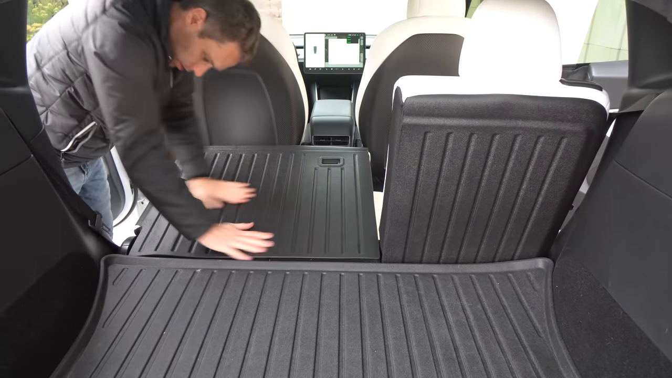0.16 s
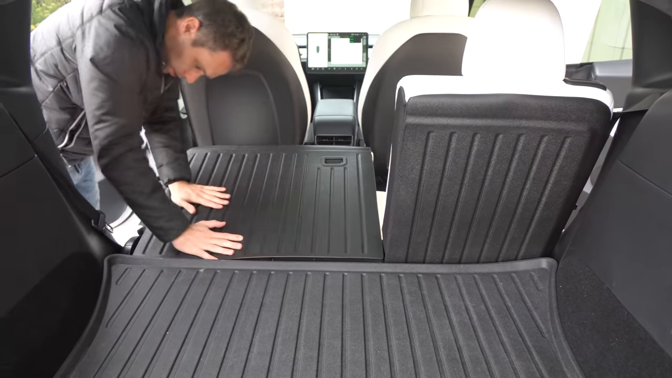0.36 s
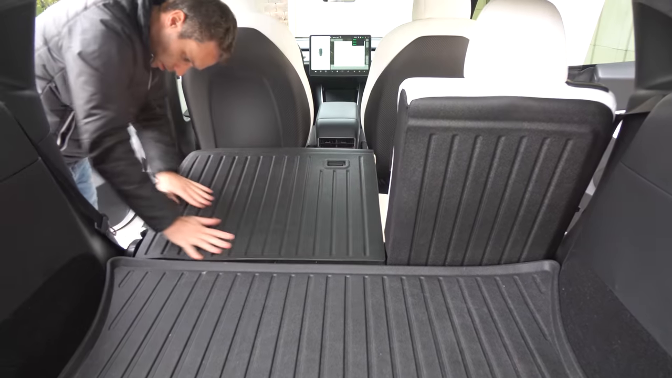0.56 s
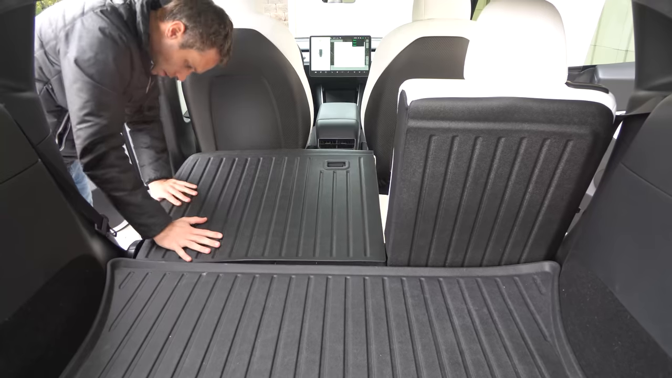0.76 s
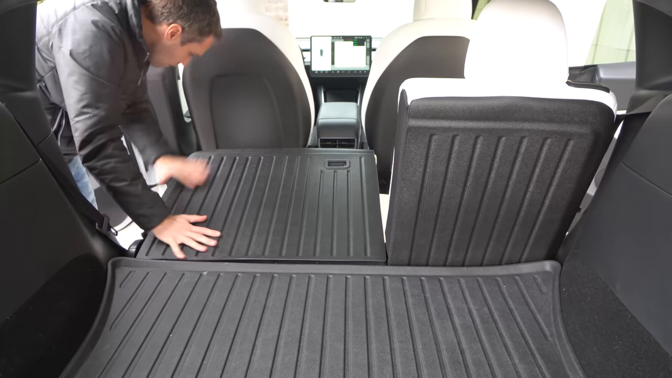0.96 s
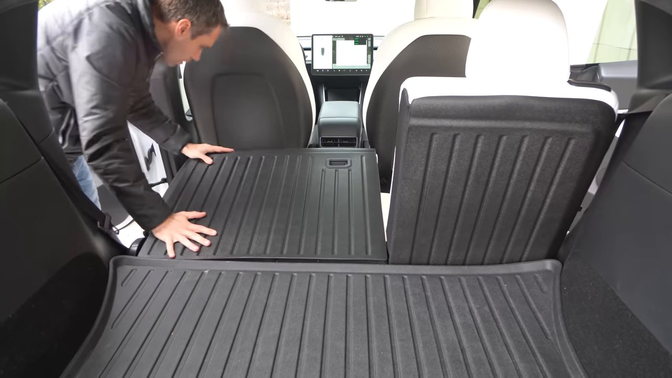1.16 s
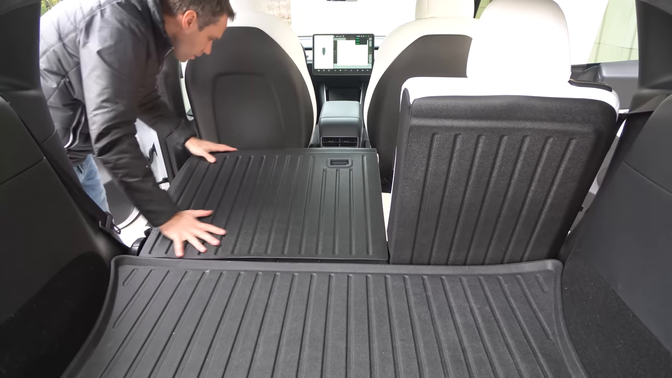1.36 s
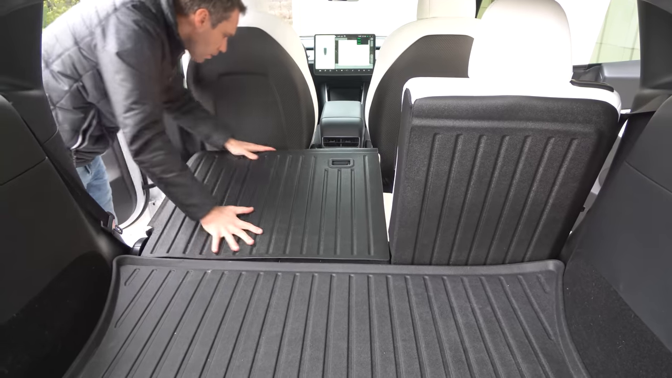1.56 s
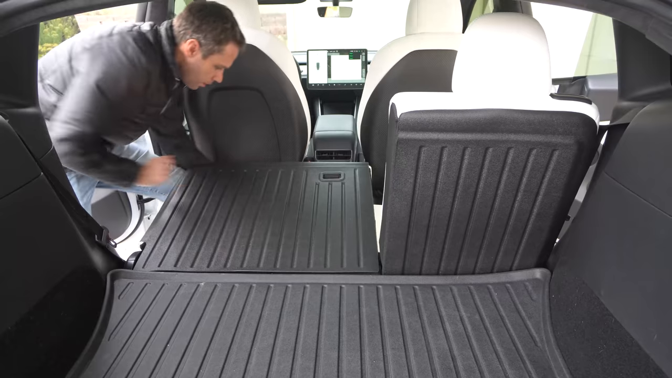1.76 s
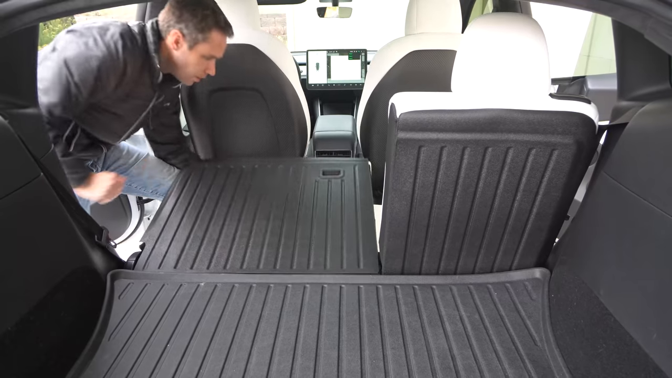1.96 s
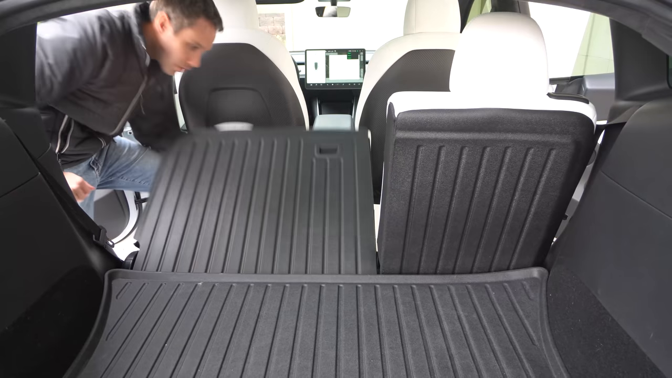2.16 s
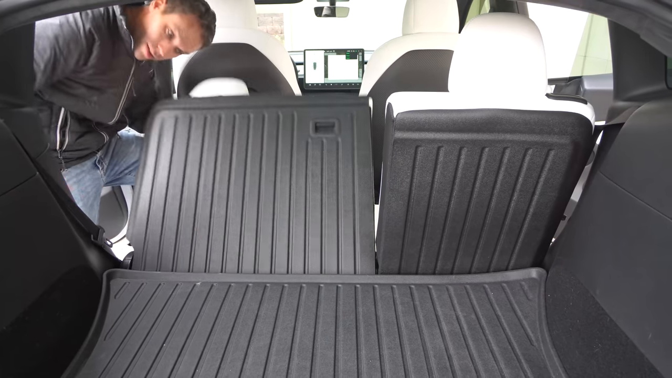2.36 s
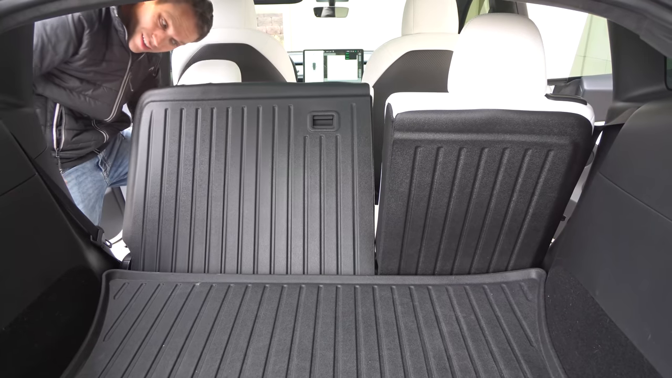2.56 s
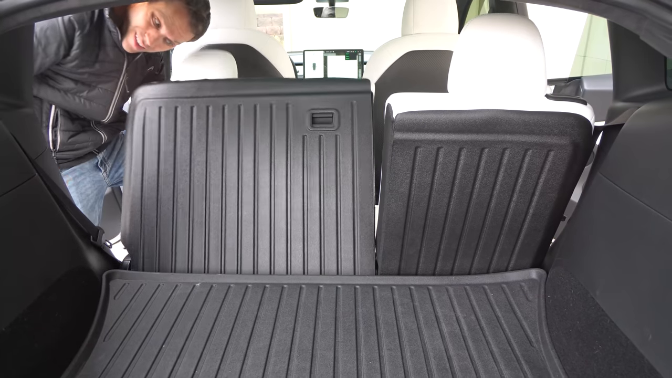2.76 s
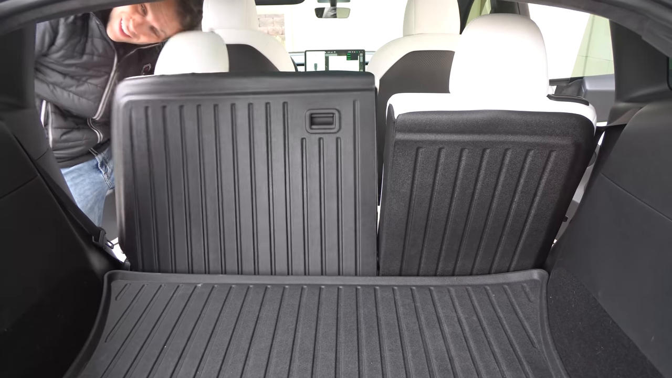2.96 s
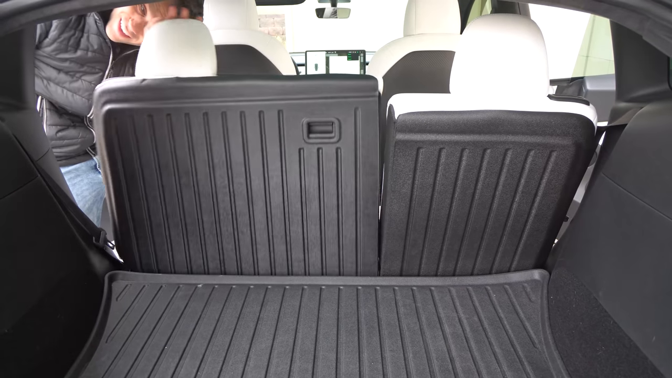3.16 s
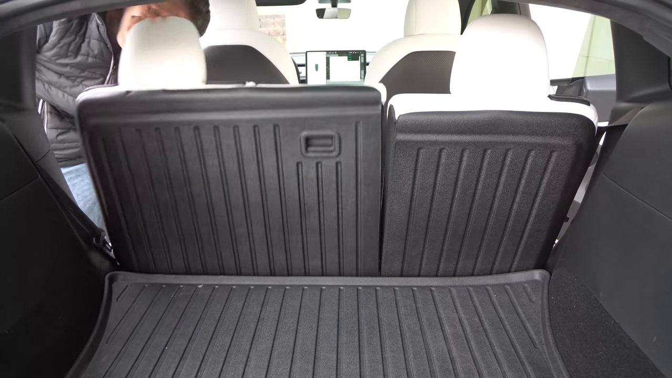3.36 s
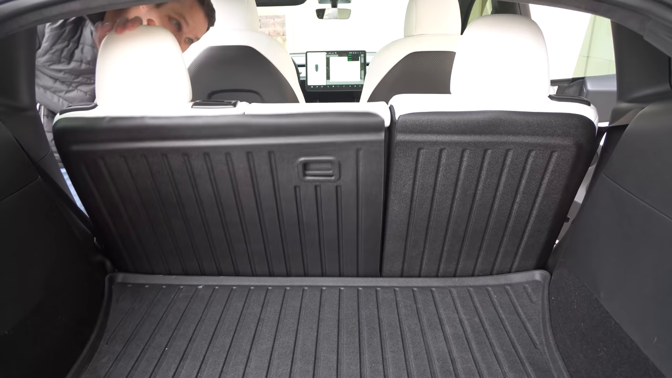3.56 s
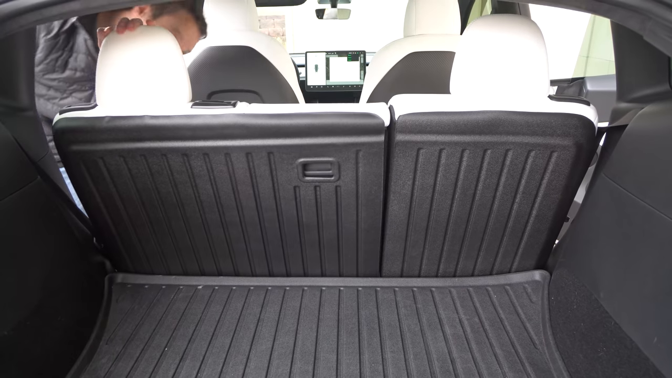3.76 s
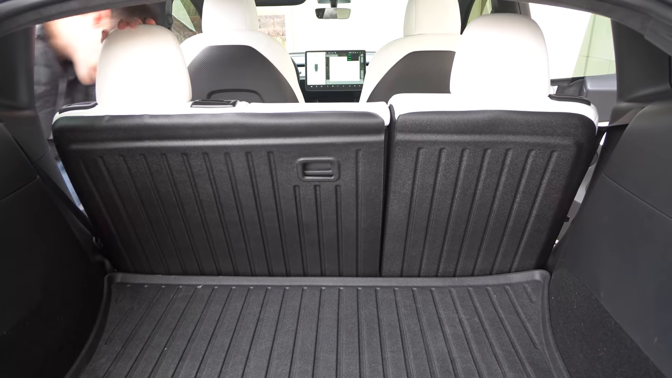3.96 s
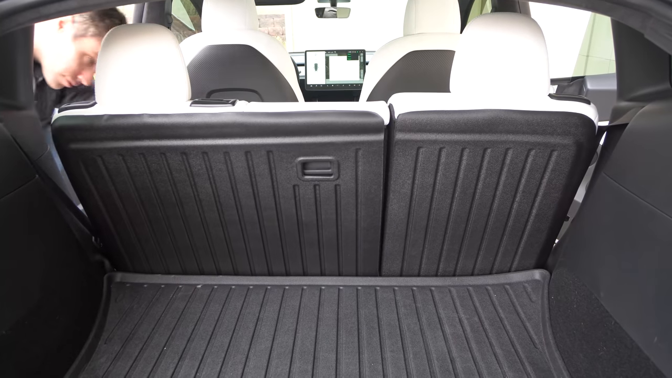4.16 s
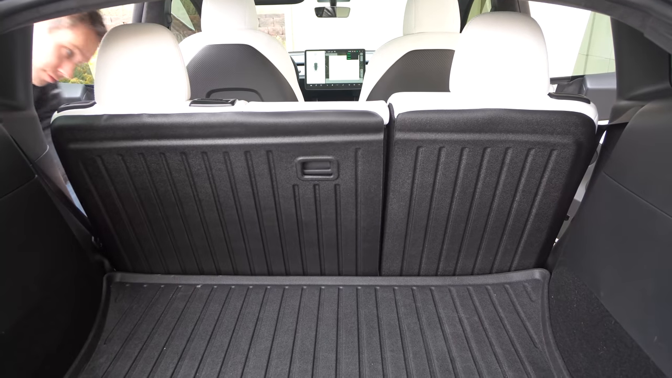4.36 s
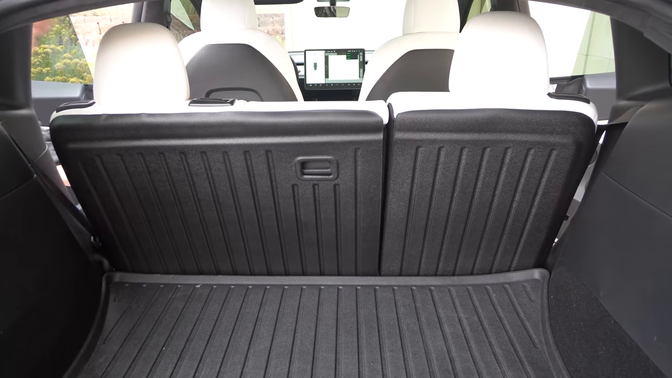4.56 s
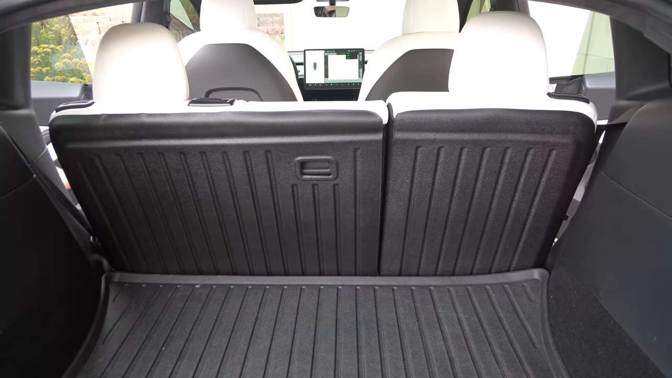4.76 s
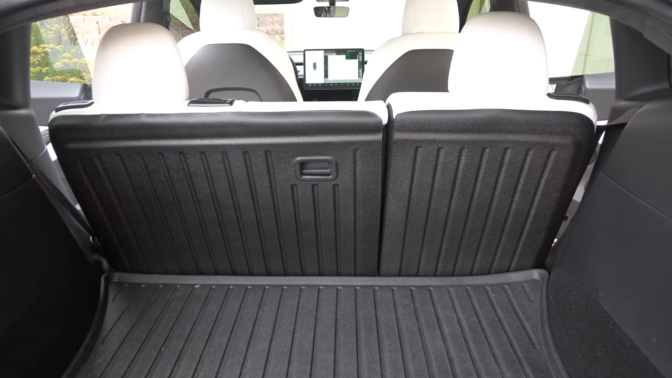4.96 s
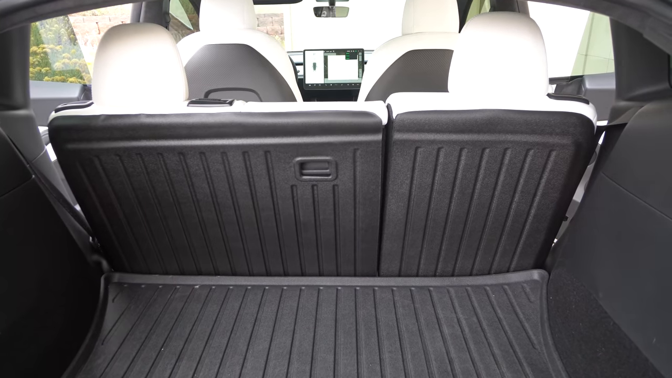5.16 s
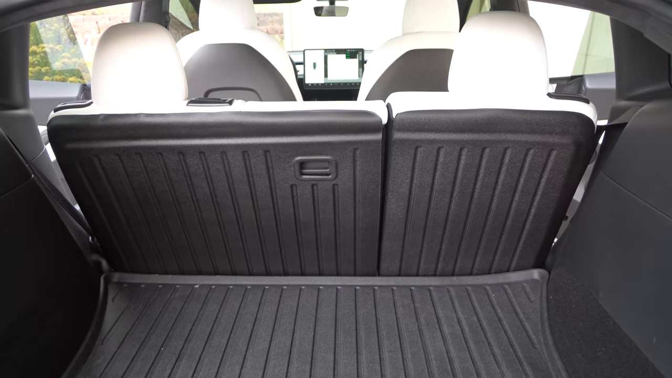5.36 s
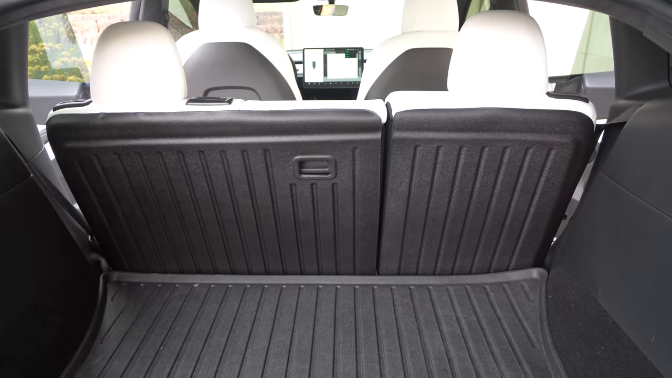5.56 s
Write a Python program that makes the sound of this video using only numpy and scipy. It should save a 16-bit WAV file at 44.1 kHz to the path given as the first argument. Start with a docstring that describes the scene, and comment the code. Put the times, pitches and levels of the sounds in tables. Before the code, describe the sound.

A close mono sound inside a car with its doors open. From 0 to 0.8 s, hands pat and rub a ribbed rubber seat cover: quick dull tocks, soft slaps, crackly palm friction and sleeve swish over a low drumming rumble. Sparser brushing and pats follow at about 1.15 and 1.6 s. Birds whistle outside, with clear falling slurs near 0.8 and 1.3 s, above a faint chattering chorus and soft open-air noise. From 2.1 to 2.4 s hollow knocks and scrapes crowd together, ending in a deep thump as the seat back lifts. Light rustling and short chirps continue until a knock at 3.35 s. At 3.6 s the seat slams into its latch, the loudest event: a dense clunk with a bright steel snap and short cabin boom. Afterwards jacket swishes around 4 s, small taps near 4.7 s, more chirps, and soft final pats at 5.4 s.

```python
"""Inside a car with its doors open, hands and jacket sleeves brush over a ribbed rubber seat cover.
Friction is shaped noise with crackles and stick-slip tocks; pats are damped tones, noise and panel modes.
The folded seat back scrapes and thumps as it is raised (force pulses, cabin boom), then slams into its
steel latch (noise bursts, damped modes). Birds whistle (gliding sines) and chatter (a diffuse chorus)
outside, over open-air noise."""
import sys
import numpy as np
from scipy import signal
from scipy.fft import rfft, irfft, next_fast_len
from scipy.io import wavfile

SR = 44100
rng = np.random.default_rng(int(sys.argv[2]) if len(sys.argv) > 2 else 0)


def persist_wave(psi):
    """Save psi, clipped to +-1, as 16-bit WAV."""
    counts = np.round(np.clip(psi, -1, 1) * 32767).astype(np.int16)
    wavfile.write(sys.argv[1], SR, np.atleast_2d(counts).T)


N = 247401

# noise spectrum of the cabin air's boom: f/Hz, relative level per Hz/dB
CABIN_SPECTRUM = [(25, -20), (55, 1), (80, -2.5), (100, 3), (135, -3.5), (250, -8.5), (400, -21.5),
                  (900, -72)]
# noise spectrum of a palm on the cover: f/Hz, relative level per Hz/dB
PALM_SPECTRUM = [(300, -42), (900, -4), (1900, -2), (3700, 2.5), (5200, -6.5), (8000, -9.5), (15500, -21.5)]


def amp(db):
    """Level to amplitude: 20 dB is a factor of ten."""
    return 10 ** (np.asarray(db) / 20)


def unit(x):
    """Normalization to a root-mean-square of 1."""
    return x / np.sqrt(np.mean(x ** 2) + 1e-20)


def wobble(rate, size=N):
    """Slow random modulation: normal deviates, rate knots a second, joined by straight lines."""
    return np.interp(np.arange(size) * rate / SR, np.arange(4096), rng.standard_normal(4096))


def shape(points):
    """Spectral envelope: gain interpolated in dB over log frequency, from (f/Hz, level/dB) points."""
    f, db = np.transpose(points)
    return lambda hz: amp(np.interp(np.log(hz + 1), np.log(f + 1), db))


def filtered(x, response):
    """Linear filtering: the spectrum of x times a response of frequency."""
    size = next_fast_len(len(x) + 2048)
    spectrum = rfft(x, size) * response(np.fft.rfftfreq(size, 1 / SR))
    return irfft(spectrum, size)[:len(x)]


def noise(response, size=N):
    """Coloured noise: white noise through a spectral response, at rms 1."""
    return unit(filtered(rng.standard_normal(size), response))


def fade(t, t60, attack):
    """Exponential decay by 60 dB in t60 seconds, after an exponential attack."""
    return 1000 ** (-t / max(t60, .005)) * (1 - np.exp(-t / attack))


def ring(modes, t, scatter_db):
    """Modal superposition: damped sines, each with a random strength and polarity."""
    total = np.zeros(len(t))
    for hz, db, t60 in modes:
        strength = rng.choice([-1, 1]) * amp(db + scatter_db * rng.normal())
        total += strength * fade(t, t60, 0.0013) * np.sin(2 * np.pi * hz * t)
    return total


def add(track, s, sound):
    """Linear superposition: mix a sound into the track at time s."""
    start = max(round(s * SR), 0)
    track[start:start + len(sound)] += sound[:N - start]


def strokes():
    """Friction loudness follows sliding speed: each stroke speeds up, holds and dies away."""
    # strokes of the hands: start t/s, rise/s, hold/s, release T60/s,
    # sleeve level/dB, palm level/dB, scrape level/dB
    stroke_table = [(0, 0.00085, 0.015, 0.71, -54, -48.5, -52), (0.156, 0.099, 0.058, 0.25, -45, -37, -44),
                    (0.318, 0.074, 0.085, 1, -56.5, -53, -55.5),
                    (0.526, 0.12, 0.046, 0.44, -49.5, -46.5, -50.5),
                    (0.775, 0.12, 0.036, 1, -52, -60, -62.5), (1.143, 0.017, 0.0076, 0.2, -54, -49, -46.5),
                    (1.333, 0.2, 0.12, 0.1, -48.5, -52.5, -54.5),
                    (1.755, 0.0077, 0.4, 0.39, -52, -59.5, -60.5),
                    (2.073, 0.13, 0.025, 0.25, -58, -54.5, -46),
                    (2.229, 0.021, 0.057, 0.43, -55, -49.5, -43.5),
                    (2.341, 0.027, 0.024, 0.15, -51, -50, -37.5),
                    (2.661, 0.031, 0.013, 0.53, -59, -69, -58), (2.82, 0.11, 0.23, .3, -57, -54, -56),
                    (3.087, 0.044, 0.35, 0.34, -63.5, -68, -52.5),
                    (3.36, 0.22, 0.12, 0.046, -54.5, -50, -49.5),
                    (3.827, 0.09, 0.013, 0.3, -52.5, -51.5, -57),
                    (3.934, 0.055, 0.026, 0.27, -45.5, -46.5, -54),
                    (4.061, 0.055, 0.017, 0.37, -44.5, -53, -56),
                    (4.706, 0.0042, 0.021, 0.49, -43.5, -45.5, -50.5),
                    (5.405, 0.035, 0.058, 0.38, -51, -44, -52)]
    powers, t = np.zeros((3, N)), np.arange(SR) / SR
    for s, rise, hold, t60, *levels_db in stroke_table:
        onset = np.sin(np.pi / 2 * np.clip(t / rise, 0, 1)) ** 2
        speed = onset * 1000 ** (-np.maximum(t - rise - hold, 0) / t60)
        for power, db in zip(powers, levels_db):
            add(power, s, (amp(db) * speed) ** 2)  # overlapping strokes add in power
    return np.sqrt(powers)


def crackles():
    """Impulse excitation: creases flick over the ribs in tiny snaps of uneven size at random moments."""
    rate_per_s, spread_db = 150, 6.5
    t = np.arange(SR // 100) / SR
    sizes = amp(spread_db * np.clip(rng.standard_normal(N), -2, 2))
    kicks = (rng.random(N) < rate_per_s / SR) * sizes
    envelope = signal.fftconvolve(kicks, fade(t, .007, .0001))[:N]
    return unit(envelope * noise(shape(PALM_SPECTRUM)))


def slips(count=420):
    """Stick-slip: rubber lets go of the ribs at random moments, each a damped tock at its own pitch."""
    centre_hz, spread_octaves, decay_cycles = 970, 2.1, 2.3  # falls to 1/e in decay_cycles
    out, t = np.zeros(N), np.arange(SR // 20) / SR
    for when, pitch, size in rng.uniform(0, 1, (count, 3)):
        hz = centre_hz * 2 ** (spread_octaves * (pitch - .5))
        tock = np.sin(2 * np.pi * hz * t) * np.exp(-hz * t / decay_cycles)
        add(out, when * N / SR, size * tock)
    return unit(out)


def rubbing():
    """Sliding friction: fine sleeve swish, duller crackling palms, stick-slip rubber, seat rumble beneath."""
    # noise spectrum of the sleeve cloth: f/Hz, relative level per Hz/dB
    cloth_spectrum = [(300, -38), (900, -2), (2200, -3.5), (3500, -2), (5200, -7.5), (9000, -9.5),
                      (13000, -11.5), (15500, -15)]
    # noise spectrum of rubbed rubber: f/Hz, relative level per Hz/dB
    rubber_spectrum = [(30, -33), (110, 6), (250, 3), (380, 4.5), (520, -2), (800, 3.5), (1300, -5),
                       (2200, -5.5), (5000, -41), (12000, -27)]
    jacket_db = -65.5  # the jacket never quite stops rustling
    crackle_db, slip_db = -5.5, -6.5  # beside the palm noise; against the rubber noise
    lifted_s = 2.5  # until then the seat back lies flat and drums under the hands
    flat_rumble_db, upright_rumble_db = -1, -18  # against the rubber noise

    swish, press, scrape = strokes()
    sleeve = np.hypot(swish, amp(jacket_db)) * noise(shape(cloth_spectrum))
    palm_noise = noise(shape(PALM_SPECTRUM)) * amp(2.2 * wobble(130))
    palm = unit(palm_noise + amp(crackle_db) * crackles())
    rubber_noise = unit(noise(shape(rubber_spectrum)) * amp(2.6 * wobble(150)))
    rubber = rubber_noise + amp(slip_db) * slips()
    rumble_db = np.where(np.arange(N) / SR < lifted_s, flat_rumble_db, upright_rumble_db)
    rumble = amp(rumble_db) * unit(noise(shape(CABIN_SPECTRUM)) * amp(4.0 * wobble(24.55)))
    return sleeve + press * palm + scrape * (rubber + rumble)


def outdoors():
    """Ambient noise: a coloured, slowly wavering open-air background comes through the doors."""
    # level course of the open air: t/s, level/dB
    air_levels = [(0, -55), (3.7, -54.5), (4.4, -58), (5.6, -53.5)]
    # noise spectrum of the open air: f/Hz, relative level per Hz/dB
    air_spectrum = [(25, 1), (64, -8), (119, -1.5), (173, -3.5), (253, -5), (500, -7), (1000, -8.5),
                    (1950, -9.5), (2300, -7), (3500, -3), (4200, -11), (5000, -16), (9000, -32),
                    (15500, -41)]
    level_db = np.interp(np.arange(N) / SR, *np.transpose(air_levels)) + 0.67 * wobble(12)
    return amp(level_db) * noise(shape(air_spectrum))


def whistle(length, start_hz, end_hz, bend, swell_db, warble):
    """Frequency modulation: the phase of a gliding, wavering sine is the running sum of its frequency."""
    flutter_db = 2  # random waver of the level
    u = np.linspace(0, 1, int(max(length, .02) * SR))
    glide_hz = end_hz + (start_hz - end_hz) * (1 - u) ** bend  # bend above 1 slides fast, then levels off
    hz = glide_hz * (1 + warble * wobble(150.3, len(u)))
    swell = amp(swell_db * (u - .5) + flutter_db * wobble(68.0, len(u)))
    level = np.abs(np.sin(np.pi * u)) ** 0.067 * swell
    return level * np.sin(2 * np.pi * np.cumsum(hz) / SR)


def birds(count=1100):
    """Direct and reverberant field: the fainter a whistler, the more it is echo; a distant chorus is all echo."""
    # whistled slurs: start t/s, length/s, start f/Hz, end f/Hz, bend (1 = straight), level/dB,
    # swell over the note/dB
    slurs = [(.44, 0.033, 4780, 4640, 1.5, -49, -6), (0.822, 0.27, 4620, 3390, 3.1, -41.5, 7.5),
             (1.321, 0.27, 4803, 3450, 1.42, -45.5, -3), (1.959, 0.057, 5000, 4380, 3.5, -50, 4),
             (2.486, 0.04, 5190, 5060, 0.88, -57, 3), (2.535, 0.036, 2490, 2574, 1, -45, 4),
             (2.57, 0.029, 2810, 2990, 1, -48, -2), (2.642, 0.023, 3480, 3470, 1.6, -48.5, -4),
             (2.656, 0.17, 6700, 5500, 1.1, -68.5, 2), (2.814, .1, 5030, 4360, 3.3, -54.5, 0),
             (2.958, 0.025, 3760, 3560, 0.94, -45, -2), (2.98, 0.066, 4370, 3980, 1.01, -51.5, -5),
             (3.832, 0.048, 3660, 3500, 1.7, -49.5, -11), (4.176, 0.15, 3200, 3070, 1.44, -54.5, 4),
             (4.605, 0.053, 4920, 4530, 1.4, -55, -2), (4.916, 0.026, 4350, 4570, 1.4, -50, -6),
             (5.065, 0.07, 4470, 4130, 1.36, -52.5, 4), (5.175, 0.049, 4000, 3640, 1.2, -47, 2),
             (5.255, 0.044, 3800, 3750, 1, -51, -2)]
    near_db = -47.5  # level at which half of a note's power is echo
    near_waver, far_waver = 0.0058, 0.0262  # pitch waver, as shares
    wall_s, wall_db = .026, -10  # one wall answers the near whistles: delay, level
    echo_t60_s = 0.16  # birdsong among the houses
    chorus_low_hz, chorus_span_hz = 2385, 1748
    chorus_db, chorus_range_db = -65, 9  # faintest chirp and spread above it
    chirp_s, chirp_slide, chirp_warble = 0.04, 0.182, 0.0279  # length; slide and waver, as shares

    direct, diffuse, t = np.zeros(N), np.zeros(N), np.arange(SR // 2) / SR
    for s, length, start_hz, end_hz, bend, db, swell_db in slurs:
        nearness = 1 / (1 + amp(near_db - db) ** 2)
        waver = far_waver + (near_waver - far_waver) * nearness
        note = amp(db) * whistle(length, start_hz, end_hz, bend, swell_db, waver)
        near_note = np.sqrt(nearness) * note
        add(direct, s, near_note)
        add(direct, s + wall_s, amp(wall_db) * near_note)
        add(diffuse, s, np.sqrt(1 - nearness) * note)
    for when, pitch, slide, loud in rng.uniform(0, 1, (count, 4)):
        hz = chorus_low_hz + chorus_span_hz * pitch
        end_hz = hz * np.exp(chirp_slide * (slide - .5))
        chirp = whistle(chirp_s, hz, end_hz, bend=1, swell_db=0, warble=chirp_warble)
        add(diffuse, when * N / SR, amp(chorus_db + chorus_range_db * loud ** 2) * chirp)
    echo = rng.standard_normal(len(t)) * fade(t, echo_t60_s, 0.0013)
    return direct + signal.fftconvolve(diffuse, echo / np.linalg.norm(echo))[:N]


def pats():
    """Impact on damped rubber: a short tock, broad knock and bright slap; panel modes answer hollowly."""
    # hand pats and knocks of the cover: t/s, level/dB, pitch f/Hz, T60/s, slap level against the knock/dB
    pat_table = [(.002, -39.5, 420, 0.1, 4), (.105, -46.5, 316, 0.19, -9), (0.218, -40.5, 258, 0.045, -8),
                 (0.252, -36, 250, 0.13, 1), (.281, -42, 220, 0.16, 7), (.303, -35.5, 400, 0.057, 3),
                 (0.396, -37, 410, 0.028, -12), (.423, -40.5, 323.4, 0.22, -20),
                 (0.616, -38, 368, 0.035, -21), (0.75, -41, 302, 0.22, -14), (1.133, -41, 600, 0.02, -7),
                 (1.157, -36, 590, 0.054, -6.5), (1.628, -45, 714, 0.073, 3.5),
                 (1.775, -49.5, 160, 0.18, -10), (2.142, -37, 800, 0.15, -26),
                 (2.173, -27.5, 800, 0.08, -16), (2.193, -36, 330, 0.055, -22),
                 (2.233, -31.5, 800, 0.035, -15), (2.258, -33.5, 560, 0.025, -14),
                 (2.285, -35.5, 250.5, 0.051, -16), (2.333, -26.5, 795, 0.087, -17),
                 (2.359, -24.5, 517, .04, -27), (2.373, -26.5, 336, 0.1, -13),
                 (2.435, -45.5, 109, 0.31, -7), (2.538, -38.5, 710, 0.024, -8),
                 (3.122, -45.5, 212, 0.32, -11), (3.354, -31.5, 537, 0.11, -27),
                 (3.757, -41.5, 910, 0.017, -8), (3.902, -42, 258, 0.048, -16),
                 (3.918, -44.5, 270, 0.097, -24), (4.713, -40.5, 850, .05, -17),
                 (4.751, -42, 700, 0.045, -8), (4.773, -43, 1000, .05, -11), (4.903, -46, 485, 0.043, -0.5),
                 (5.022, -52, 750, 0.036, 0.5), (5.192, -46.5, 1670, 0.057, -9),
                 (5.438, -41.5, 300, 0.094, -7), (5.48, -43, 330, 0.11, 0), (5.536, -43.5, 900, 0.071, -2)]
    # modes of the hollow panel under the cover: f/Hz, relative level/dB, T60/s
    panel_modes = [(231.4, 0.5, 0.15), (322, 1, 0.023), (394, 5, 0.1)]
    attack_share, soft_below_db = 0.041, -13.5  # soft attack over T60; slap level under which a blow is soft

    out, t = np.zeros(N), np.arange(SR // 4) / SR
    for s, db, pitch_hz, t60, slap_db in pat_table:
        # dull blows are soft and swell slowly
        attack = .0001 + attack_share * t60 / (1 + amp(slap_db - soft_below_db) ** 2)
        # gone in two or three cycles
        tock = amp(1.0) * np.sin(2 * np.pi * pitch_hz * t) * np.exp(-pitch_hz * t)
        # a broad spectral hump about the pitch
        knock = noise(lambda hz: (hz / pitch_hz) ** 1.3 / (1 + (hz / pitch_hz) ** 3.5), len(t))
        slap = amp(slap_db) * noise(shape(PALM_SPECTRUM), len(t))
        panel_drive = amp(-8) * min(1, 350 / pitch_hz) ** 2  # low blows drive it most
        hollow = panel_drive * ring(panel_modes, t, scatter_db=3.5) * (1 - np.exp(-t / attack))
        add(out, s, amp(db) * ((tock + knock + slap) * fade(t, t60, attack) + hollow))
    return out


def thumps(count=3):
    """Force pulses: the rocking seat back pushes to and fro, booms the cabin, and its slam shudders the body."""
    # the heavy seat back meeting its hinge and stop: t/s, level/dB, contact/s, loss a rock/dB
    thump_table = [(2.376, -13, 0.0033, 0.5), (3.593, -14, 0.0038, 13), (3.605, -26, 0.0053, -2.5)]
    rock_s = 0.0061  # from one push to the next, opposite one
    slam_s = 3.6  # the seat back lands against its stop

    out, t = np.zeros(N), np.arange(SR // 2) / SR
    for s, db, contact, loss_db in thump_table:
        push = np.sin(np.pi * np.minimum(t / contact, 1)) ** 2
        for k in range(count):
            boom = amp(-18) * noise(shape(CABIN_SPECTRUM), len(t)) * fade(t, .17, .003)
            signed_push = -(-1) ** k * push  # pushes alternate in direction
            add(out, s + k * rock_s, amp(db - k * loss_db) * (boom + signed_push))
    shudder = amp(-29.5) * noise(shape(CABIN_SPECTRUM), len(t)) * fade(t, 0.53, 0.011)
    cabin_mode = amp(-23) * fade(t, 0.25, 0.0051) * np.sin(2 * np.pi * 98 * t)
    add(out, slam_s, shudder + cabin_mode)
    # open doors let the deepest bass out
    bass_cut = signal.butter(2, 60, "highpass", fs=SR, output="sos")
    return signal.sosfilt(bass_cut, out)


def latch():
    """Impact excites modes: the catch rides over the striker and snaps home, frame clunking, pawl pinging."""
    # latch and frame contacts: t/s, frame level/dB, steel level/dB, noise T60/s
    contacts = [(3.573, -36.5, -80, 0.3), (3.587, -20, -33, 0.055), (3.592, -11.5, -21, 0.035),
                (3.598, -22, -22.5, 0.066), (3.608, -16.5, -32, 0.097), (3.6188, -17, -51, 0.081),
                (3.665, -31.5, -54, 0.056)]
    # modes of the seat frame: f/Hz, relative level/dB, T60/s
    frame_modes = [(227.6, -10, 0.21), (386, -3, 0.13), (596, 2.5, 0.055), (685, -5.5, 0.095),
                   (770, -5, .06), (805, -15, 0.067), (986, -17, 0.053), (1240, -5, 0.055),
                   (1314, -5, 0.13), (1390, -8, 0.072)]
    # modes of the steel pawl: f/Hz, relative level/dB, T60/s
    pawl_modes = [(6912, -8, 0.11), (7040, -8, .04), (10280, -16.5, 0.09)]
    # noise spectrum of the frame clunk: f/Hz, relative level per Hz/dB
    clunk_spectrum = [(35, -10), (70, 2), (113, 2), (275, -2), (396, 3), (490, -13), (600, -2.5),
                      (1000, -3), (1400, -6), (1900, -13), (3640, -17), (6000, -39), (9000, -52)]
    # noise spectrum of the steel snap: f/Hz, relative level per Hz/dB
    steel_spectrum = [(800, 0), (2000, -11), (3800, 3), (5500, -5), (7000, -7), (9000, -7.5), (15500, -14)]

    out, t = np.zeros(N), np.arange(SR // 3) / SR
    for s, frame_db, steel_db, t60 in contacts:
        frame = ring(frame_modes, t, scatter_db=2)
        pawl = ring(pawl_modes, t, scatter_db=2)
        clunk = noise(shape(clunk_spectrum), len(t)) * fade(t, t60, 0.00031) + amp(-8.0) * frame
        snap = noise(shape(steel_spectrum), len(t)) * fade(t, t60, 0.00032) + amp(-1.0) * pawl
        add(out, s, amp(frame_db) * clunk + amp(steel_db) * snap)
    return out


def scene():
    """Linear superposition of all sources in one channel."""
    return (rubbing() + outdoors() + birds() + pats() + thumps() + latch())[None]


def record(dry):
    """Band limitation: nothing passes at or above the top frequency."""
    top_hz = 15800
    return np.array([filtered(x, lambda hz: hz < top_hz) for x in dry])


dry = scene()
out = record(dry)
persist_wave(out)
```